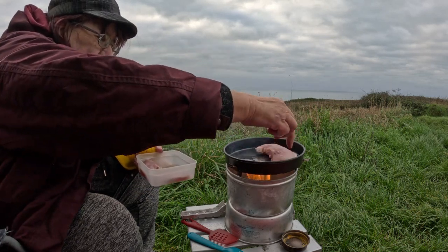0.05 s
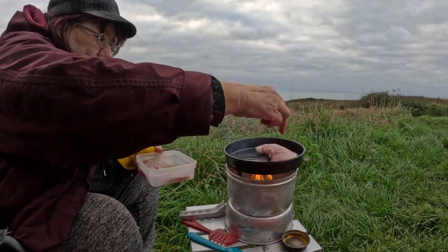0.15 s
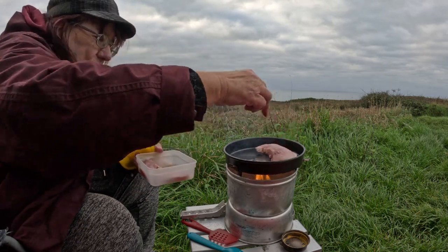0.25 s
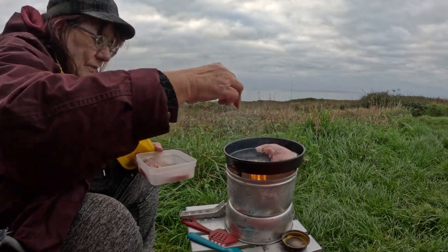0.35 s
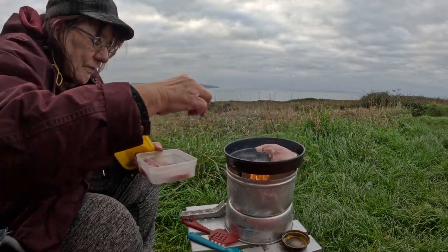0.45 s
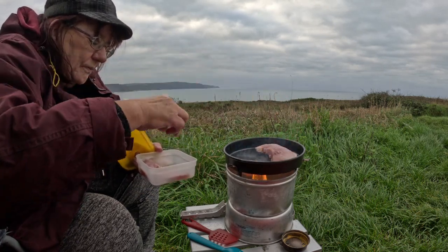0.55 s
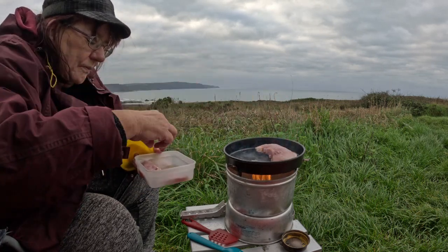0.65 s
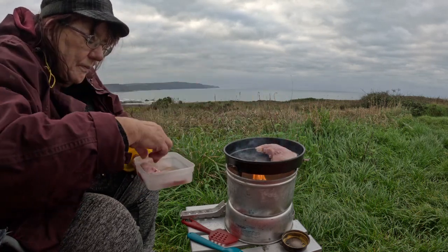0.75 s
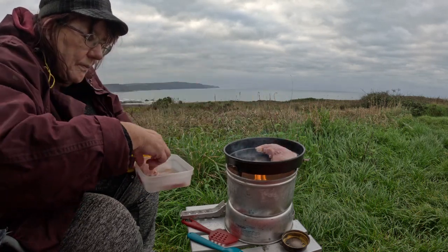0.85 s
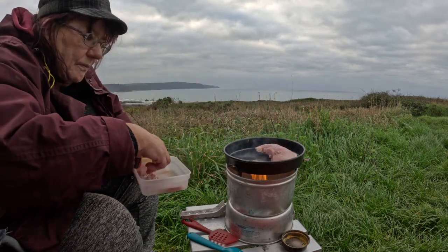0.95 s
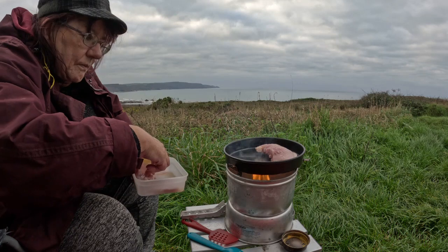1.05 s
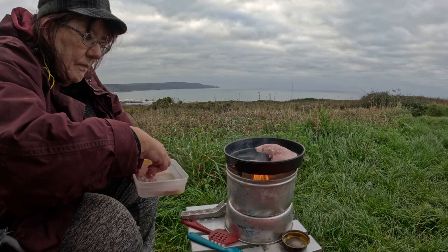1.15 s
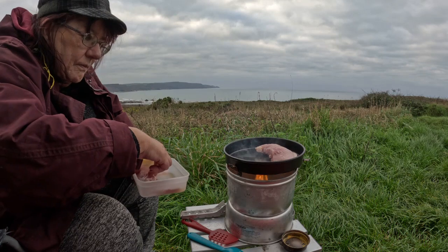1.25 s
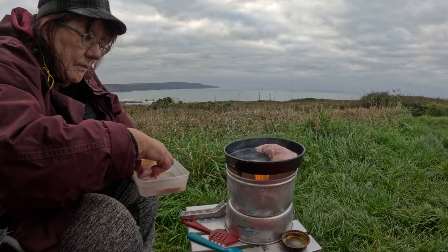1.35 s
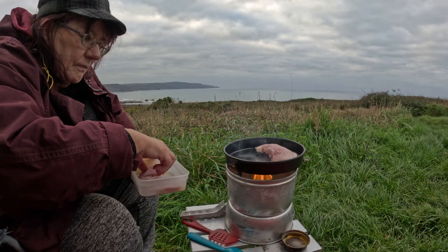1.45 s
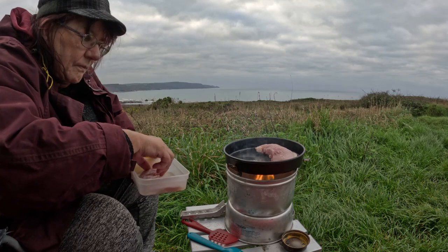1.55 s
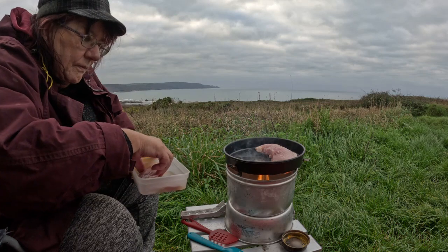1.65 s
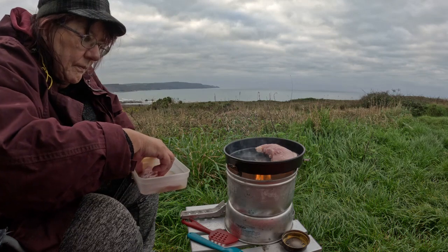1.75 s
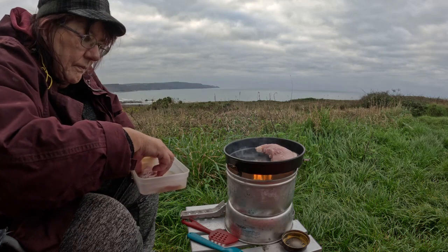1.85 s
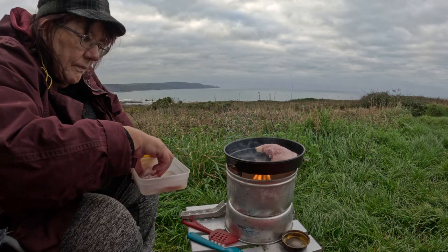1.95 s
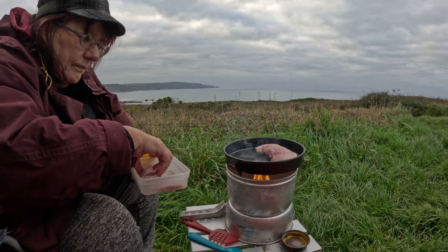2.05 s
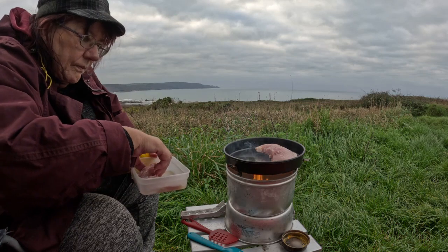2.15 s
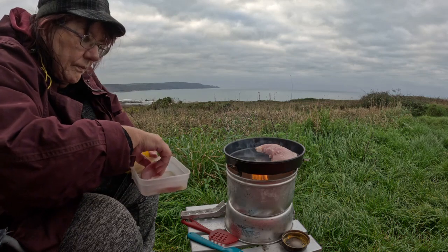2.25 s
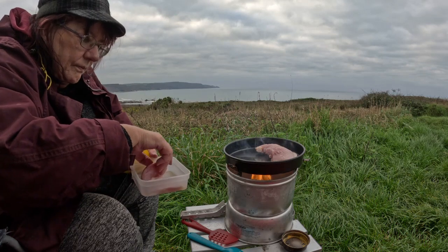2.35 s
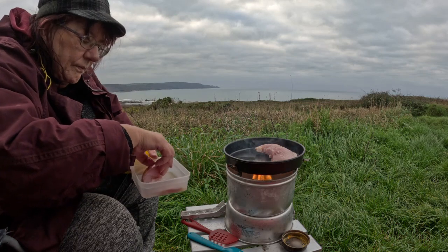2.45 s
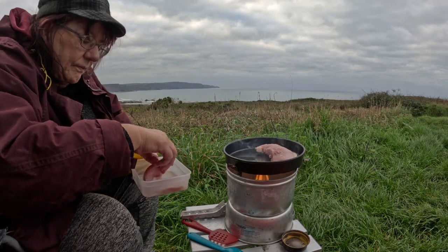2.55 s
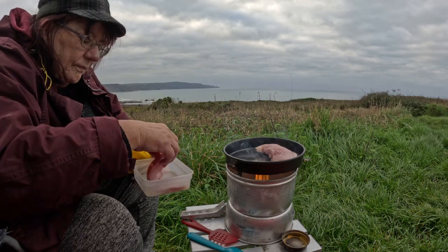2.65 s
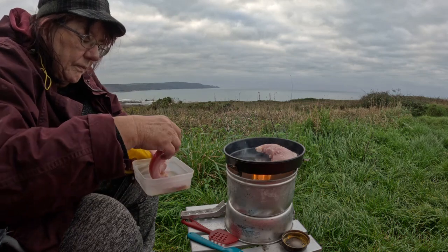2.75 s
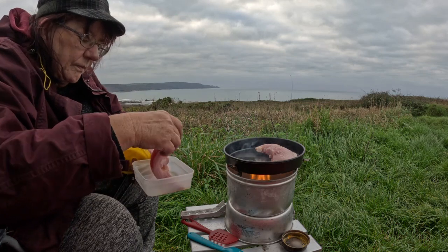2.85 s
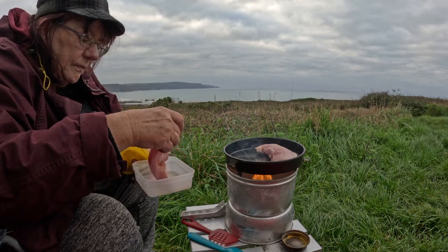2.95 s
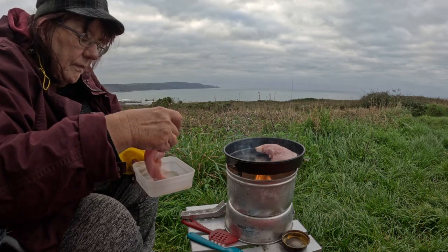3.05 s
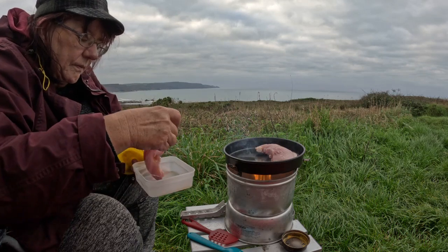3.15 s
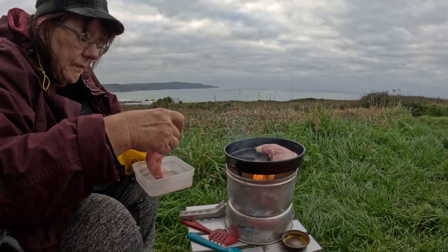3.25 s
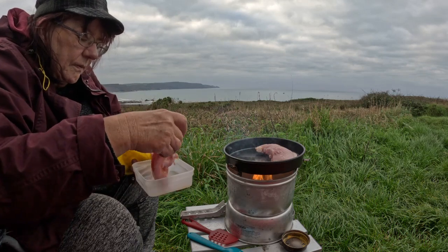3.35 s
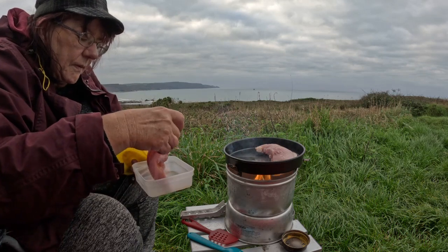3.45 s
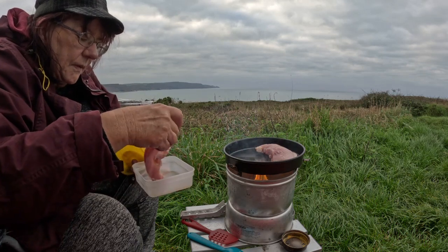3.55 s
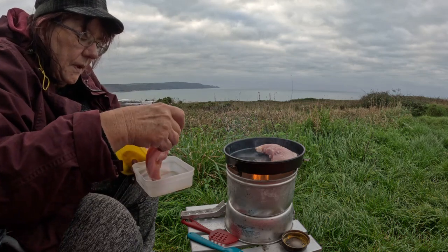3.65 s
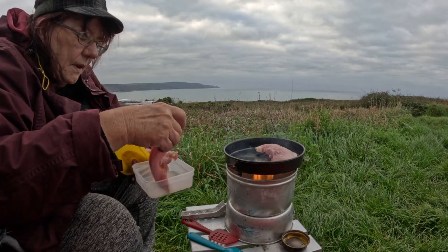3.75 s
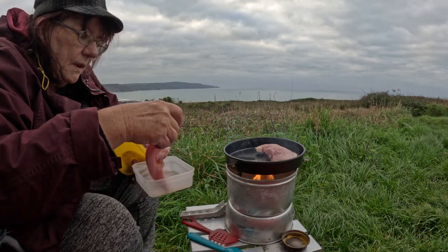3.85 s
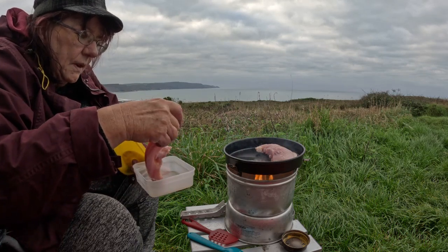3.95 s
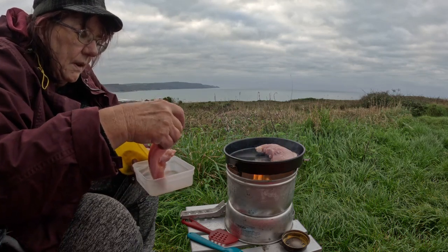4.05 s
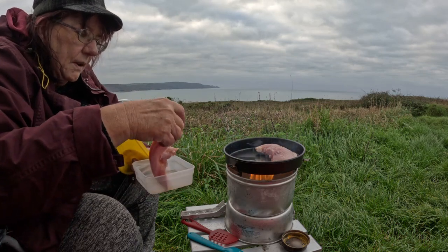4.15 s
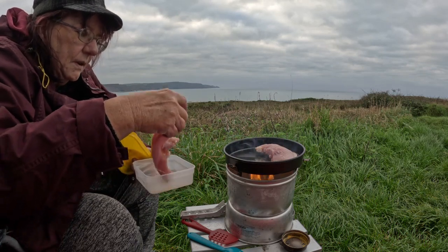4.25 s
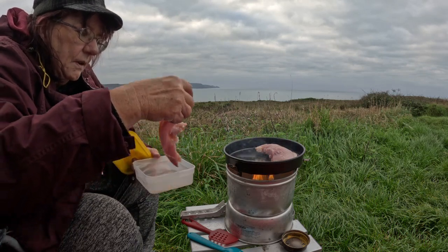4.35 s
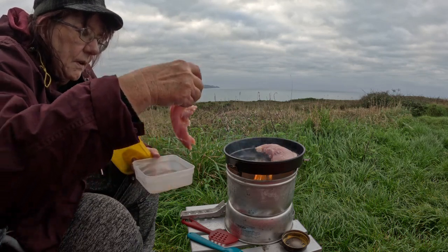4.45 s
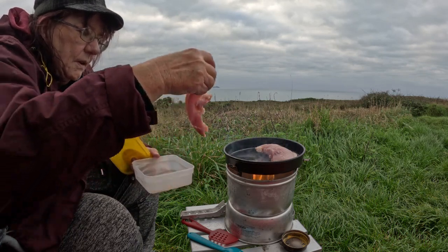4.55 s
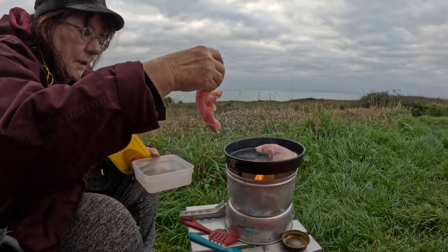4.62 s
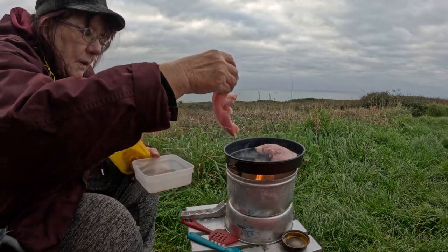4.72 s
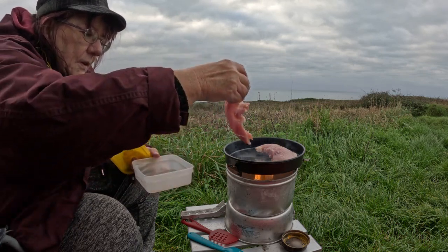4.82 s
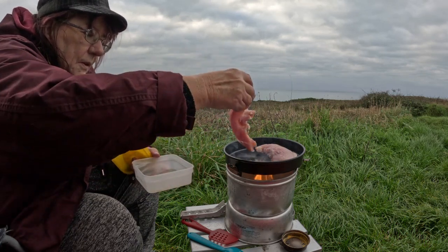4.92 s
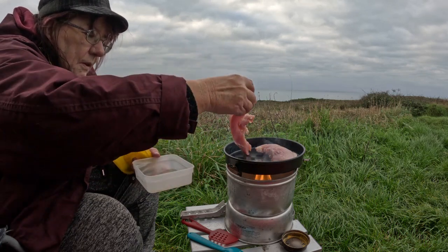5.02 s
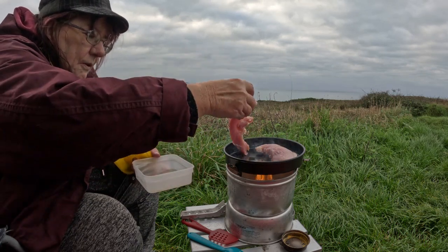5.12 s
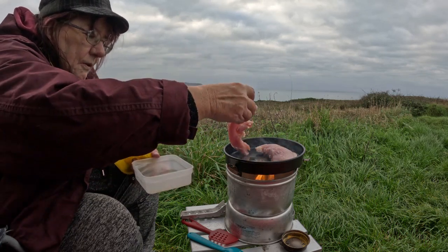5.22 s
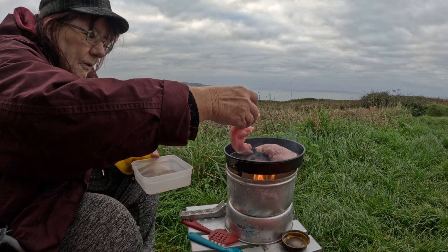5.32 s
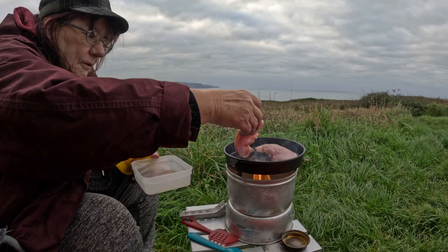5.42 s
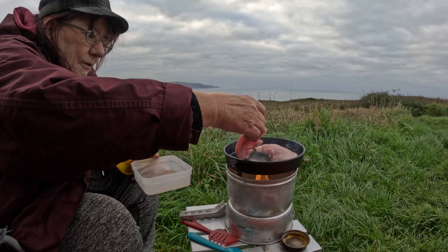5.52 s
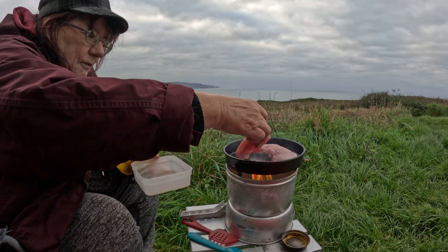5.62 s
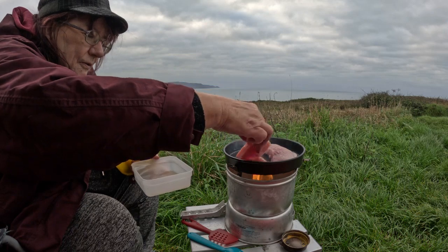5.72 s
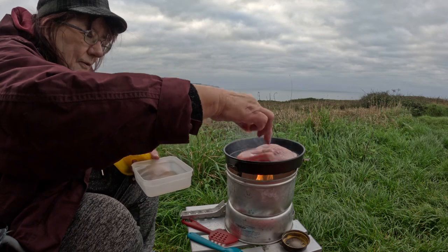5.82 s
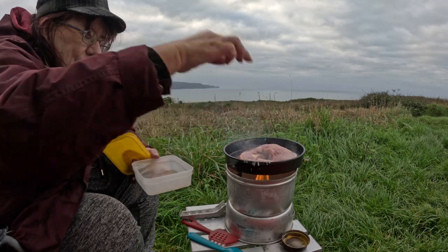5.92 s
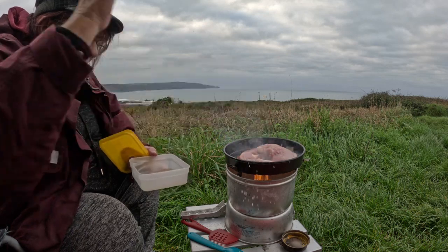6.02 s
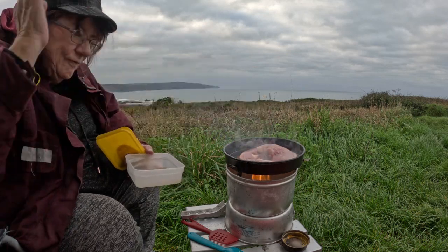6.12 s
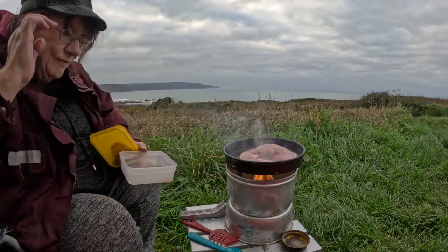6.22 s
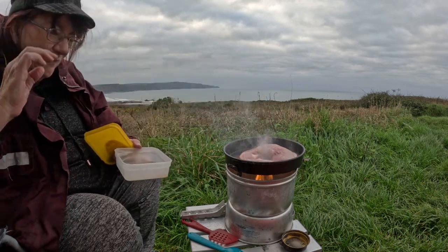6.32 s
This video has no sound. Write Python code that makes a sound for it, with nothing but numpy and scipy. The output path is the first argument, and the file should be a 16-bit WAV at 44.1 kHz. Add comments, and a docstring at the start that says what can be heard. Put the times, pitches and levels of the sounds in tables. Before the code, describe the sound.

Raw meat searing in a hot pan outdoors, calming to an uneven crackling simmer, then a second piece sizzles up loudly over low rumble.

```python
"""On an open hillside, raw meat fries in a small pan over a camp burner; a second piece is laid in near the end.
Bubbles bursting in the fat are random clicks, hiss and short rings, coloured by the pan's resonances.
Loud spits are cracks with a ring and spray; steam jets are shaped hiss and wet squeaks are gliding tones.
Below lies a low filtered-noise rumble with two wavering hums. A food box knocks and rustles softly,
and a puff of air, a slow sway with low flutter, hits the microphone as the arm passes."""
import sys
import numpy as np
from scipy import signal
from scipy.fft import rfft, irfft
from scipy.io import wavfile
from scipy.ndimage import uniform_filter1d

SR = 44100
rng = np.random.default_rng(int(sys.argv[2]) if len(sys.argv) > 2 else 0)


def to_wav(sig):
    """Store sig (one row per channel, or 1-D mono) as 16-bit WAV at the path in sys.argv[1].

    Samples outside -1..1 are clipped; the rate is SR.
    """
    pcm = np.clip(np.atleast_2d(sig), -1, 1) * 32767
    pcm = np.round(pcm).astype(np.int16)
    wavfile.write(sys.argv[1], SR, pcm.T)  # frames by channels


N = 281358   # length in samples

# Distant rumble. Each row: time in seconds, deep level in dB, upper level in dB.
RUMBLE_LEVELS = [(0.0, -35, -44.5), (0.43, -42, -43), (1.01, -35.5, -43), (1.15, -41, -42.5),
                 (1.54, -39.5, -43.5), (2.02, -41.5, -44.5), (2.42, -38, -45.5), (3.16, -38.5, -45),
                 (3.61, -37.5, -44.5), (4.01, -34.5, -45), (4.12, -32, -43), (4.69, -33.5, -44.5),
                 (5.47, -38.5, -48.5), (5.93, -32.5, -47), (6.18, -40.5, -49.5), (6.38, -48, -45)]
# Colour of the deep and of the upper rumble. Each row: frequency in Hz, relative gain in dB.
DEEP_COLOUR = [(8.8, -18), (15, 1.5), (59, 6), (73, 0), (87, -9), (130, -18.5), (170, -71), (290, -120)]
UPPER_COLOUR = [(41, -22.5), (70, -12), (87, -6.5), (137, -11.5), (284, -19), (312, -21), (340, -24.5),
                (900, -28.5), (1170, -51), (1980, -120)]
# Two wavering hums. Each row: time in seconds, low hum in Hz, its level in dB, high hum in Hz, its level in dB.
HUMS = [(0, 58, -33.5, 114, -42.5), (1.3, 52, -40, 113.9, -47), (1.45, 57.04, -42.5, 130.3, -65),
        (1.62, 62, -45, 147, -45), (2.3, 60, -43, 149, -48.5), (3, 62, -42.5, 123.7, -56),
        (4.2, 64, -49, 112, -92), (5.2, 55, -44.5, 109.7, -58.5), (6.38, 55, -42, 112, -78)]

# Puffs of air. Each row: start in seconds, sway level in dB, sway frequency in Hz, flutter level in dB.
GUSTS = [(5.737, -15.5, 27.4, -23), (5.875, -27, 17.6, -38)]
# Colour of the air's flutter. Each row: frequency in Hz, relative gain in dB.
FLUTTER_COLOUR = [(30, -32), (60, 16.5), (110, 8.0), (150, -4), (250, -10), (500, -24.0), (2000, -56)]
GUST_RISE_S, GUST_HOLD_S, GUST_FALL_DB_PER_S = 0.0153, 0.057, 280

# Soft knocks. Each row: start in seconds, level in dB, pitch in Hz, time in seconds to fade by 60 dB.
KNOCKS = [(0.152, -26, 636, 0.064), (0.649, -30, 290, 0.053), (0.680, -27, 272, 0.07)]
KNOCK_RISE_S = 0.0044
TICK_S, TICK_DB, TICK_LENGTH_S = 4.08, -29, 0.025   # a dry rustle on the food box

# Wet squeaks as steam forces a gap under the meat.
# Each row: start in seconds, length in seconds, start pitch in Hz, end pitch in Hz, level in dB.
SQUEAKS = [(0.636, 0.016, 3950, 4020, -34), (5.585, .01, 2800, 3500, -24), (5.59, 0.039, 2480, 2500, -32),
           (5.734, 0.023, 4000, 3480, -25), (5.922, .016, 3800, 3950, -26), (6.008, 0.027, 3000, 3750, -23),
           (6.03, 0.017, 3950, 4100, -22), (6.138, 0.028, 690, 760, -39), (6.135, 0.012, 1740, 1860, -27),
           (6.084, 0.018, 1370, 1400, -30)]
SQUEAK_ROUGHNESS = 0.64   # spread of the flutter around a steady level of 1

# Steam squeezing out under the meat. Each row: start in seconds, nominal length in seconds (stretched below),
# centre in Hz, width in Hz, level in dB before the pan colours it.
JETS = [(0.339, 0.014, 6200, 3000, -26.5), (0.41, 0.038, 4930, 2000, -30), (0.442, .011, 5540, 4000, -26),
        (5.416, 0.11, 3060, 1210, -38.5), (5.568, 0.023, 3420, 1200, -27), (5.638, 0.032, 7400, 1500, -31),
        (5.693, 0.032, 2410, 300, -30.5), (5.727, 0.0079, 4020, 1000, -19), (5.752, 0.03, 7350, 2000, -26),
        (5.79, 0.0063, 11000, 5000, -27), (5.955, 0.011, 2300, 400, -23.5), (5.96, 0.0092, 4840, 1200, -22),
        (5.995, 0.012, 3500, 900, -19.5), (6.005, 0.012, 2520, 500, -20.5), (6.045, 0.0073, 2530, 500, -19),
        (6.082, 0.093, 709, 60, -39.5), (6.355, .016, 1240, 700, -29.5), (5.55, 0.0055, 1500, 1800, -36),
        (3.639, 0.016, 7650, 1800, -34.5), (5.976, 0.0048, 3600, 1500, -27),
        (5.621, 0.0049, 3300, 400, -25), (5.899, 0.019, 2260, 400, -26.5), (3.899, 0.005, 900, 1200, -40),
        (6.27, .02, 3640, 300, -25), (5.65, .014, 7900, 1400, -26), (6.138, 0.01, 2300, 400, -22),
        (6.246, .0084, 3130, 500, -19), (6.297, 0.0086, 1320, 900, -25), (6.314, 0.0065, 3140, 700, -28)]
JET_CRACKLE = 1.4      # 0 = smooth hiss, more = spitting
JET_SKEW = 0.84        # below 1 the swell is quicker than the fade
JET_PAN_SHARE = 0.57   # share of the pan's resonances, in dB

# Spitting bubbles. Each row: start in seconds, level in dB before the pan colours the spray, pitch in Hz,
# time in seconds for the spray to fade by 60 dB.
SPITS = [(0.226, -19, 2680, .04), (0.293, -25, 2690, .04), (0.349, -18, 2730, .04),
         (0.4461, -22, 5640, .04), (0.6402, -17, 4000, .03), (1.36, -17, 2590, 0.03),
         (1.3805, -16.5, 2610, 0.042), (1.6792, -19, 3750, .05), (1.689, -15, 3700, 0.034),
         (1.738, -21, 2700, 0.036), (1.834, -18.5, 3890, 0.045), (2.0905, -18, 2640, 0.025),
         (2.238, -15, 3740, 0.027), (2.365, -15, 3770, .02), (2.444, -15.5, 3700, 0.022),
         (2.5105, -21, 3770, 0.049), (2.618, -18.5, 2730, .04), (3.2255, -16, 6000, 0.012),
         (3.231, -10, 3300, 0.013), (3.2962, -27, 2900, 0.017), (3.367, -19, 4020, 0.033),
         (3.647, -19, 3660, 0.046), (4.08, -16, 3670, 0.026), (4.37, -19, 3580, .02),
         (4.663, -17.5, 2800, 0.017), (4.797, -18, 2720, 0.027), (5.082, -16.5, 3340, 0.03),
         (5.145, -20.5, 7500, .03), (5.1785, -12, 4800, .015), (5.2407, -18.5, 4040, 0.025),
         (5.485, -19, 7500, 0.018), (5.573, -23, 3320, 0.045), (5.586, -14, 3200, 0.016),
         (5.637, -8, 7400, 0.026), (5.682, -10, 4020, 0.016), (5.792, -7, 4500, .012),
         (5.8204, -10, 5750, .04), (5.871, -17, 3560, .03), (5.887, -7, 4300, 0.013),
         (5.9655, -10, 4650, 0.01), (6.039, -4, 3300, .015), (6.049, -7, 2600, .018),
         (6.116, -10, 3600, 0.016), (6.274, -5, 4500, .012), (6.297, -4, 2800, .014),
         (6.339, -3.5, 3200, .02)]
SPIT_RISE_S, SPIT_CRACK = 0.00056, 2.2   # the crack is a one-sample jump
SPIT_GRAIN_DB = 15.4     # multiplies noise that has been smoothed over 36 samples
SPIT_RING_SHARE = 0.42   # the ring's fade time as a share of the spray's
SPRAY_SPAN = 2.3         # spray reaches this factor either side of its pitch

# Colour of the bursts in the fat. Each row: frequency in Hz, gain in dB.
FAT_COLOUR = [(180, -26), (300, -22.5), (769, -15.5), (1200, -11), (1940, -12.5), (2600, -4), (3200, -2.5),
              (3810, -3.5), (5480, -6), (7620, -8.5), (9500, -13.5), (10600, -13), (13500, -21.5),
              (15500, -52)]
# Pan resonances and dips, which change with what lies in it. Each row: frequency in Hz, width in Hz,
# then the gain in dB with fresh meat, with settled meat and with both pieces.
PAN_RESONANCES = [(705, 50, 3, 3, 7), (850, 70, -4, -7, -9), (950, 40, 4, 3, 5), (1210, 250, 4, 3, 2),
                  (1390, 80, 2, 4, 8), (1530, 70, -6, -6, -7), (1790, 80, 6, 4, 5), (1980, 90, -6, -6, -5),
                  (2200, 50, 5, 5, 3), (2320, 80, -9, -7, 0), (2450, 50, 2, 3, 2), (2670, 130, 7, 7, 1),
                  (2900, 150, -2, 3, 1), (3100, 90, -4, -4, -5), (3250, 60, 0, 3, 1), (3450, 70, 2, -1, 3),
                  (3720, 100, 4, 6, 4), (3930, 120, 1, 4, 0), (4250, 150, 2, 0, 0), (4400, 90, -2, -3, -4),
                  (4600, 50, 2, 4, 3), (4760, 50, 1, 4, -2), (5150, 100, 2, 1, 0), (5400, 180, -1, -4, 1),
                  (5600, 80, 0, -4, 0), (5720, 70, 4, 1, 3), (5980, 100, 5, 2, 4), (6110, 50, -4, -4, -5),
                  (6230, 65, 3, 4, 0), (6760, 120, -4, 2, 0), (6950, 150, -1, -1, 2), (7150, 100, 0, 3, 2),
                  (7360, 120, 4, 4, 2), (7670, 70, 5, 1, 1), (7850, 110, 2, 7, 6), (8420, 90, 4, 4, 2),
                  (10400, 200, 4, 3, 4), (11500, 80, 4, 4, 4)]
SETTLES_S, LOADED_S = (1, 2.05), (5.15, 5.63)   # the pan passes from one state to the next

# First piece: bare fat murmurs, the meat lands, sears and calms as the pan cools.
BARE_FAT_DB, SEAR_DB, SETTLED_DB = -34, -26, -36
LAID_S, CATCH_S, COOLING_S = 0.14, 0.02, 0.89
FIRST_LARGE_DB, FIRST_FINE_DB = -11.5, -5   # large bubbles and fine spray, over the sizzle
FRESH_FINE_DB, FRESH_S = 1, 0.51            # the fresh sear sprays finer for a moment
HOT_LEAN_DB = -2   # while the pan is hottest the middle bubbles lean to the lower range
# The first piece simmers unevenly. Each row: time in seconds, then changes in dB to the level, the large bubbles,
# the middle bubbles' lean to the higher range, the small bubbles and the fine spray.
SIMMER = [(0.15, -3, 0, 1, -1, -1.5), (0.3, -0.5, -2, .5, -2.5, -1.5), (0.5, -2, 1, .5, 1, 0.5),
          (0.8, 1, 0.5, 0, -4.5, -2.5), (1.15, 0.6, -0.7, -0.5, -1, -1.5), (1.6, 1, -0.5, -0.5, -0.8, 1.5),
          (1.95, -0.4, -0.9, 0, 0, 1.1), (2.6, .5, -1, 1, 0, 1.5), (2.95, 1, 1.5, 1, -1, -0.5),
          (3.35, 1.5, -2, -0.5, -0.5, -1.5), (3.7, -0.4, 1, 0.5, 0.5, 0.2), (4.2, 0, 2.5, 2, -1.5, 1.1),
          (4.7, 2.2, -1.5, -0.4, -3, 0), (5.1, -1.5, 2, 2.5, 4.5, 2.5)]
# The second piece drips, then is lowered in. Each row: time in seconds, sizzle level in dB,
# large bubbles and fine spray in dB over the sizzle, the middle bubbles' lean to the higher range in dB.
SECOND_PIECE = [(5.0, -37, -6.5, -0.5, 1), (5.42, -37.5, -8, 0, -0.5), (5.5, -32, -14, -5.5, -0.5),
                (5.59, -30.5, -12, -6.5, 2), (5.66, -25.5, -15.5, -7.5, 3.5), (5.71, -27.5, -13.5, -3, 3.5),
                (5.78, -28.5, -9, 2, 4), (5.85, -26.5, -13, -3, -1.5), (5.91, -24.5, -11, -3.5, 3.5),
                (6.0, -17.5, -16.5, -9, -1), (6.1, -17.5, -12.5, -9, 0.5), (6.3, -18, -11.5, -9, -0.5),
                (6.38, -20.5, -12, -8, -1)]
# With both pieces in: more pitched bubbles and a faster sputter; POP_SHARE sets the blunt pops.
WET_SHARE, SPUTTER_DB, POP_SHARE = 0.24, 0.39, 0.7

# Stereo width. Each row: frequency in Hz, gain of the side signal in dB.
SIDE_COLOUR = [(25, -10), (80, -23), (250, -10.5), (600, -6.5), (1300, -9.5), (2500, -10), (4500, -9),
               (8000, -7.5), (12000, -4), (15000, 3.5)]
# The two microphone ports differ. Each row: frequency in Hz, left phase lead in radians, left over right in dB.
PORTS = [(100, 0, .3), (600, -.1, -.8), (1500, -.5, -1), (2800, -.65, -1.5), (5000, -.4, -.2),
         (10000, -.35, 0), (14000, 0, 1)]
CUTOFF_HZ = 15650   # from here up, everything is at least 60 dB down


def amp(db):
    """Turn decibels into a gain."""
    return 10 ** (np.asarray(db) / 20)


def rms_one(x):
    """Scale a signal to an average strength (rms) of 1."""
    return x / np.sqrt(np.mean(x ** 2) + 1e-20)


def in_time(rows):
    """Read the columns of a time table at every sample, joined by straight lines."""
    s, *columns = np.transpose(rows)
    return [np.interp(np.arange(N) / SR, s, column) for column in columns]


def at_hz(points, hz):
    """Read a table of frequencies and values on a logarithmic frequency axis."""
    p = np.array(points, float)
    return np.interp(np.log(hz + 1), np.log(p[:, 0] + 1), p[:, 1])


def drift(rate_hz):
    """Slow random wandering with a spread of 1: noise smoothed by two equal one-pole low-pass filters."""
    r = np.exp(-40 * np.pi * rate_hz / SR)   # computed at every 20th sample
    noise = rng.standard_normal(N // 20 + 4002)
    slow = signal.lfilter([1], [1, -2 * r, r * r], noise)[4000:]   # drop the filter's start-up
    return np.interp(np.arange(N) / 20, np.arange(len(slow)), rms_one(slow - slow.mean()))


def colour(x, db_at, size=16384):
    """Filter without ringing ahead of the sound (minimum phase); its gain in dB is db_at(Hz)."""
    cepstrum = irfft(np.log(amp(db_at(np.fft.rfftfreq(size, 1 / SR)))), size)
    cepstrum[1:size // 2] *= 2
    cepstrum[size // 2 + 1:] = 0
    response = irfft(np.exp(rfft(cepstrum)), size)[:size // 2]
    return signal.fftconvolve(x, response[None], axes=1)[:, :N]


def band(x, low_hz, high_hz):
    """Keep the range between two frequencies."""
    return signal.sosfilt(signal.butter(2, [low_hz, high_hz], "band", fs=SR, output="sos"), x)


def ring(at_s, hz, t60, rise_s):
    """One fading sine with a soft start, placed in time."""
    out, t = np.zeros(N), np.arange(int(t60 * SR)) / SR
    start = round(at_s * SR)
    shape = np.minimum(t / rise_s, 1) * amp(-60 * t / t60)
    out[start:start + len(t)] = (np.sin(2 * np.pi * hz * t) * shape)[:N - start]
    return out


def stereo(mid_side):
    """Turn mid and side into left and right, with the side coloured against the mid."""
    mid, side = mid_side[0], colour(mid_side[1:], lambda hz: at_hz(SIDE_COLOUR, hz))[0]
    return np.array([mid + side, mid - side])


def wavering(hz, width_hz):
    """A tone whose level and phase wander slowly, with an rms of 1."""
    phase = 2 * np.pi * np.cumsum(hz * np.ones(N)) / SR
    return rms_one((0.5 + drift(width_hz)) * np.cos(phase) + drift(width_hz) * np.sin(phase))


def rumble():
    """Distant low noise, lumpy and nearly alike on both ports, with two hums in it."""
    deep_db, upper_db = in_time(RUMBLE_LEVELS)
    deep = colour(rng.standard_normal((2, N)), lambda hz: at_hz(DEEP_COLOUR, hz))
    upper = colour(rng.standard_normal((2, N)), lambda hz: at_hz(UPPER_COLOUR, hz))
    noise = amp(deep_db + 0.3 * drift(5.4)) * deep / deep.std()
    noise = noise + amp(upper_db + 2.3 * drift(2.35)) * upper / upper.std()
    low_hz, low_db, high_hz, high_db = in_time(HUMS)
    hums = amp(low_db) * wavering(low_hz, 3.7) + amp(high_db) * wavering(high_hz, 9.6)
    return stereo(noise) + hums


def puff():
    """Moving air makes the microphone sway for a few cycles and flutters on its ports."""
    flutter = colour(rng.standard_normal((2, N)), lambda hz: at_hz(FLUTTER_COLOUR, hz))
    flutter, uneven, out = flutter / flutter.std(), drift(25), 0
    for s, sway_db, sway_hz, flutter_db in GUSTS:
        t = np.arange(N) / SR - s
        fall_s = np.maximum(t - GUST_RISE_S - GUST_HOLD_S, 0)
        shape = np.clip(t / GUST_RISE_S, 0, 1) * amp(-GUST_FALL_DB_PER_S * fall_s)
        sway = np.sqrt(2) * np.sin(2 * np.pi * sway_hz * t)
        # a small part is opposite on the two ports
        across = 0.067 * (amp(flutter_db) * flutter[1] + amp(sway_db - 25) * uneven) * [[1], [-1]]
        out = out + shape * (amp(sway_db) * sway + amp(flutter_db) * flutter[0] + across)
    return out


def knocks():
    """Box and meat touch down softly, each touch a short fading tone."""
    return sum(amp(db) * ring(s, hz, t60, KNOCK_RISE_S) for s, db, hz, t60 in KNOCKS)


def tick():
    """A finger slips on the plastic box: a short dull burst of noise that dies quickly."""
    out, t = np.zeros((2, N)), np.linspace(0, 1, int(TICK_LENGTH_S * SR))
    start, noise = round(TICK_S * SR), rng.standard_normal((2, 4000))
    noise = 0.5 * band(noise, 1200, 1500) + band(noise, 500, 2500)
    shape = np.minimum(8 * t, 1) * (1 - t) ** 2
    out[:, start:start + len(t)] = amp(TICK_DB) * shape * rms_one(noise[:, -len(t):])
    return stereo(out)


def squeaks():
    """Steam forcing a gap under the meat squeaks: a short gliding tone with a fluttering level."""
    out = np.zeros(N)
    noises = rng.standard_normal((len(SQUEAKS), 4000))
    for (s, length, start_hz, end_hz, db), noise in zip(SQUEAKS, noises):
        hz = np.linspace(start_hz, end_hz, int(length * SR))
        flutter = 1 + SQUEAK_ROUGHNESS * rms_one(uniform_filter1d(noise, size=60))[:len(hz)]
        swell = 2 * np.sqrt(np.hanning(len(hz)))
        tone = np.sin(2 * np.pi * np.cumsum(hz) / SR)
        start = round(s * SR)
        out[start:start + len(hz)] += amp(db) * swell * flutter * tone
    return out


def pan_db(hz, state=1):
    """Colour of a burst heard through the pan's resonances; state 0 is fresh, 1 settled, 2 both pieces."""
    resonances = sum(db[state] / (1 + (2 * (hz - f) / width) ** 2) for f, width, *db in PAN_RESONANCES)
    return at_hz(FAT_COLOUR, hz) + resonances


def jets():
    """Steam squeezed out under the meat: a quick swell and slower fade of hiss in one limited range."""
    out = np.zeros((2, N))
    for (s, length, hz, width_hz, db), noise in zip(JETS, rng.standard_normal((len(JETS), 2, 20000))):
        crackling = noise * np.abs(noise[0]) ** JET_CRACKLE
        hiss = band(crackling, hz - width_hz / 2, hz + width_hz / 2)[:, 2000:]   # drop the filter's start-up
        progress = np.linspace(0, 1, int(1.43 * length * SR))
        swell = np.sin(np.pi * progress ** JET_SKEW) ** 1.16
        start = round(s * SR)
        out[:, start:start + len(swell)] += amp(db) * swell * rms_one(hiss[:, :len(swell)])
    return stereo(colour(out, lambda hz: JET_PAN_SHARE * (pan_db(hz, state=2) - at_hz(FAT_COLOUR, hz)) - 1.5))


def spits():
    """A large bubble cracks, rings briefly at its pitch and throws a short grainy spray."""
    spray, tone = np.zeros((2, N)), np.zeros(N)
    t = np.arange(1300) / SR
    noise = rng.standard_normal((len(SPITS), 3, len(t)))
    for (s, db, hz, t60), (mid, side, grain) in zip(SPITS, noise):
        grain_db = SPIT_GRAIN_DB * uniform_filter1d(grain, size=36)
        shape = np.minimum(t / SPIT_RISE_S, 1) * amp(-60 * t / t60 + grain_db)
        mid[0] += SPIT_CRACK / shape[1]      # the skin of the bubble snaps
        shape[0] = shape[1]                  # so that the snap is not multiplied by zero
        start = round(s * SR)
        burst = band(shape * [mid, side], hz / SPRAY_SPAN, hz * SPRAY_SPAN)
        spray[:, start:start + len(t)] += amp(db) * burst[:, :N - start]
        tone += amp(db - 7.0) * ring(s, hz, SPIT_RING_SHARE * t60, SPIT_RISE_S)
    top_db = np.max(pan_db(np.linspace(300, 15000, 300)))
    return stereo(colour(spray, lambda hz: 0.59 * (pan_db(hz) - top_db))) + tone


def vigour():
    """Level of the sizzle and changes in the shares of its bubbles, as the pan cools and is filled again."""
    t = np.arange(N) / SR
    frying_s, laid = np.maximum(t - LAID_S, 0), np.clip((t - LAID_S) / CATCH_S, 0, 1)
    heat = laid * np.exp(-frying_s / COOLING_S)
    first_db = BARE_FAT_DB + (SETTLED_DB - BARE_FAT_DB) * laid + (SEAR_DB - SETTLED_DB) * heat
    second_db, large_db, fine_db, lean_db = in_time(SECOND_PIECE)
    both = np.clip((t - SECOND_PIECE[0][0]) / 0.19, 0, 1)   # the second piece takes over
    large_db = both * (large_db - FIRST_LARGE_DB)
    fresh_db = FRESH_FINE_DB * laid * np.exp(-frying_s / FRESH_S)
    fine_db = both * (fine_db - FIRST_FINE_DB) + fresh_db
    level_db = first_db + both * (second_db - first_db)
    small_db = 0.7 * fine_db + 0.1 * (level_db - np.median(level_db))   # a harder sear is brighter
    shares_db = (level_db, large_db, both * lean_db + HOT_LEAN_DB * heat, small_db, fine_db)
    return [db + uneven_db * (1 - both) for db, uneven_db in zip(shares_db, in_time(SIMMER))]


def bursts(per_s, spread_db, hiss):
    """Random bubble bursts of uneven size on steam hiss; the side is the same burst from a random direction."""
    sizes = amp(spread_db * np.minimum(rng.exponential(1, N), 5)) * rng.choice([-1, 1], N)
    clicks = rms_one(sizes * (rng.random(N) < per_s / SR))
    direction = rng.standard_normal(N)
    return np.array([clicks, clicks * direction]) + hiss * rng.standard_normal((2, N))


def pitched_bubbles(per_s, cycles, spread_db=2.2, count=15):
    """Bubbles ring, fading by 60 dB in so many cycles, each at one of a set of pitches and from its own direction."""
    sizes = amp(spread_db * np.minimum(rng.exponential(1, N), 4)) * (rng.random(N) < per_s / SR)
    sizes = sizes * np.array([np.ones(N), rng.standard_normal(N)])   # mid and side
    dealt, out = rng.integers(0, count, N), np.zeros((2, N))         # which pitch each bubble gets
    for k, hz in enumerate(np.geomspace(600, 11000, count)):
        r, w = amp(-60 * hz / (cycles * SR)), 2 * np.pi * hz / SR
        resonator = [0, np.sin(w)], [1, -2 * r * np.cos(w), r * r]
        out += signal.lfilter(*resonator, sizes * (dealt == k) + 1e-18) * hz
    return rms_one(out)


def sizzle():
    """Bubbles of several sizes fill their own pitch ranges; all surge together, each also on its own."""
    level_db, large_db, middle_db, small_db, fine_db = vigour()
    t = np.arange(N) / SR
    settled, loaded = np.interp(t, SETTLES_S, [0, 1]), np.interp(t, LOADED_S, [0, 1])
    surge_db = (0.5 + SPUTTER_DB * loaded) * drift(40) + 0.35 * drift(13)
    ranges = [(300, 900, large_db), (900, 2050, large_db), (2050, 2950, -middle_db), (2950, 4300, middle_db),
              (4300, 6300, small_db), (6300, 8800, fine_db), (8800, 12000, fine_db), (12000, 17000, fine_db)]
    sharp = bursts(per_s=1600, spread_db=-1.0, hiss=0)   # these reach every pitch
    wet = pitched_bubbles(per_s=440, cycles=23)
    pops = pitched_bubbles(per_s=130, cycles=5, spread_db=3.5)   # sparse and blunt
    common = 0.47 * sharp + (0.6 + WET_SHARE * loaded) * wet + POP_SHARE * (0.16 + loaded) * pops
    out = 0
    for low_hz, high_hz, share_db in ranges:
        own = bursts(per_s=3000, spread_db=5.5, hiss=1.8)
        flicker_db = (1 - loaded / 2) * drift(13.0) + SPUTTER_DB * loaded * drift(45.0) + 0.77 * drift(2.6)
        out = out + amp(share_db + surge_db + flicker_db) * band(common + own, low_hz, high_hz)
    shares = (1 - settled, settled * (1 - loaded), loaded)   # fresh, settled, both pieces
    out = sum(share * colour(out, lambda hz: pan_db(hz, state)) for state, share in enumerate(shares))
    # even out the strength between 2000 and 5500 Hz, then set the level
    return amp(level_db) * stereo(out / np.std(band(out[0], 2000, 5500)))


def scene():
    """All sources as they reach the microphone, from the background to the frying."""
    return rumble() + puff() + knocks() + tick() + squeaks() + jets() + spits() + sizzle()


def record(dry):
    """The two ports hear with slightly different phase and level; the top is cut."""
    hz, rows = np.fft.rfftfreq(N, 1 / SR), np.array(PORTS)
    lead, level_db = at_hz(rows[:, :2], hz), at_hz(rows[:, ::2], hz)
    half = np.exp(0.5j * lead) * amp(level_db / 2)   # half the difference goes to each port
    ports = irfft(rfft(dry) * [half, 1 / half], N)
    return signal.sosfilt(signal.cheby2(20, 60, CUTOFF_HZ, fs=SR, output="sos"), ports)


dry = scene()
out = record(dry)
to_wav(out)
```